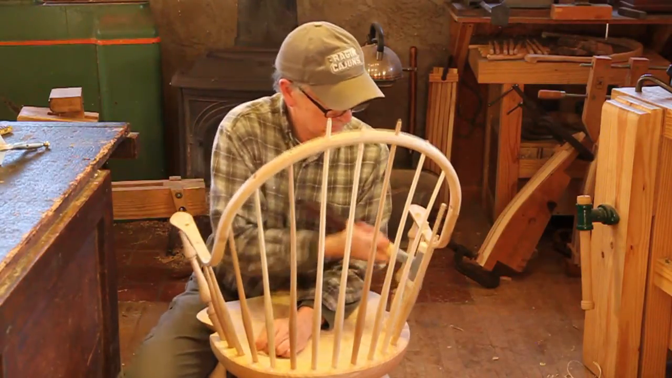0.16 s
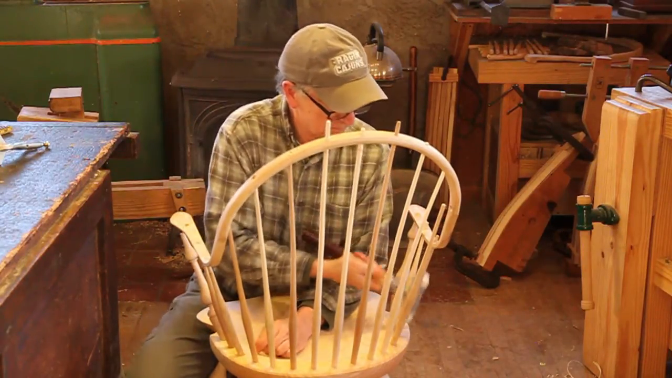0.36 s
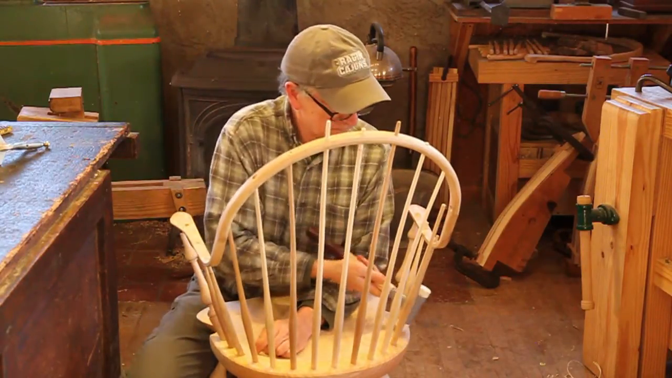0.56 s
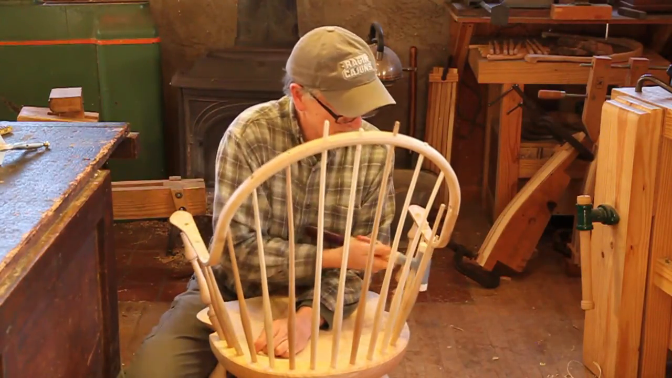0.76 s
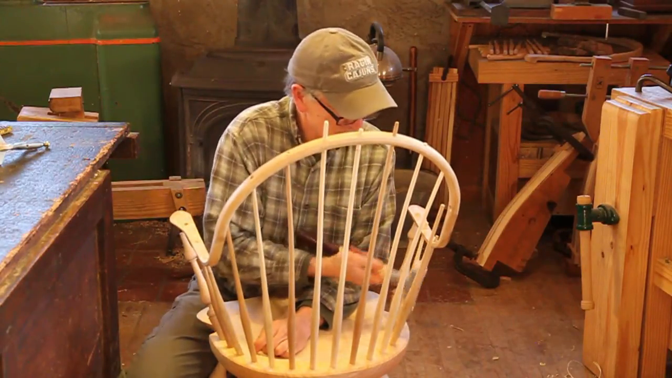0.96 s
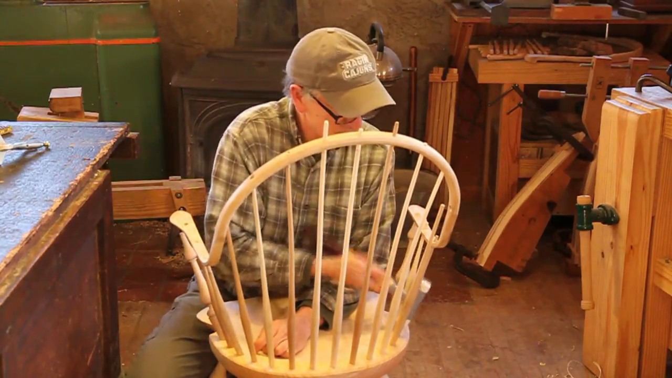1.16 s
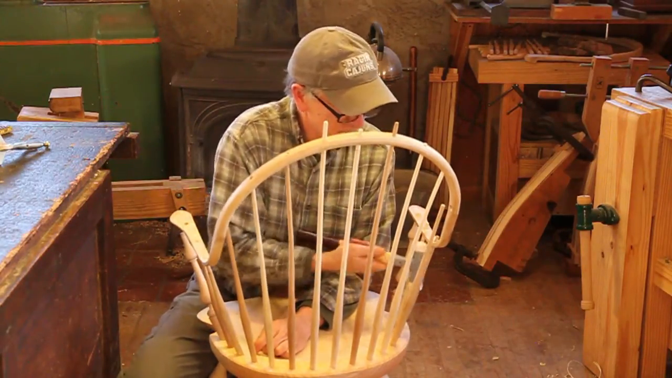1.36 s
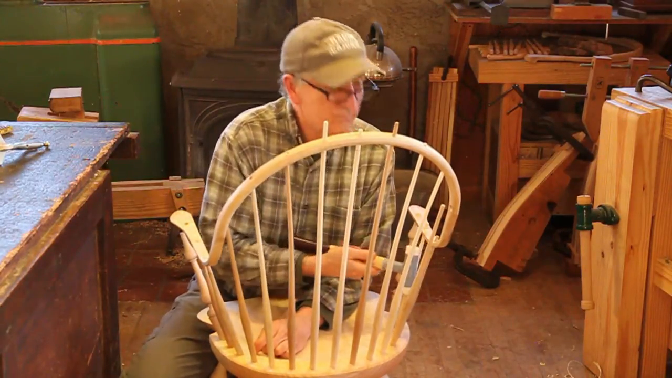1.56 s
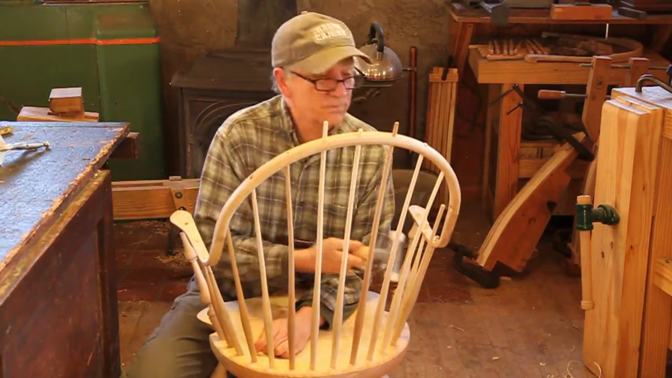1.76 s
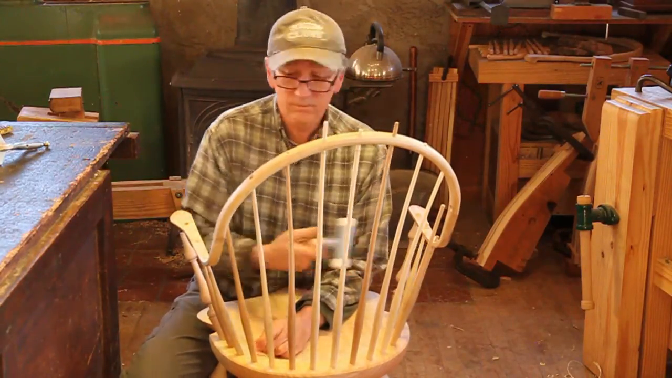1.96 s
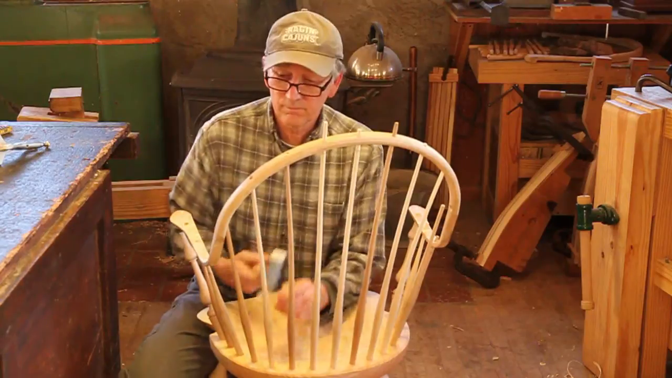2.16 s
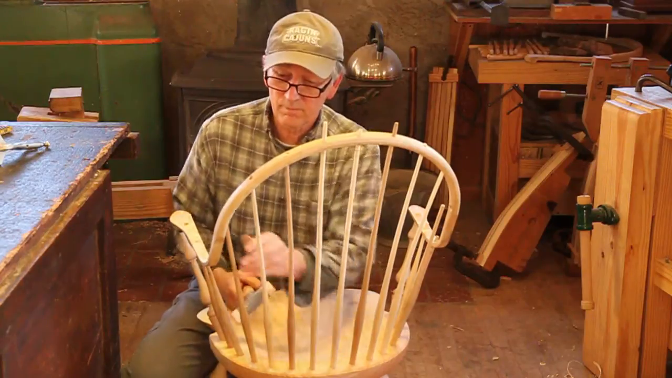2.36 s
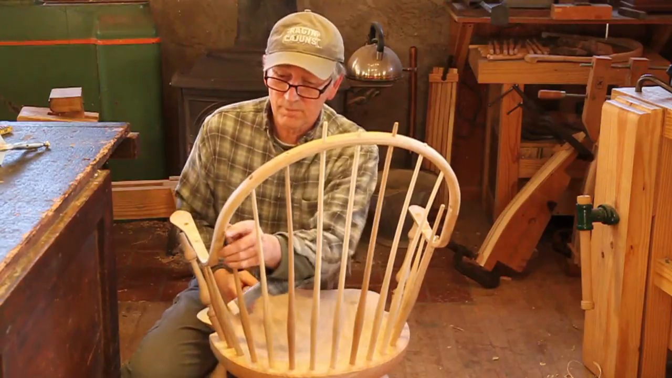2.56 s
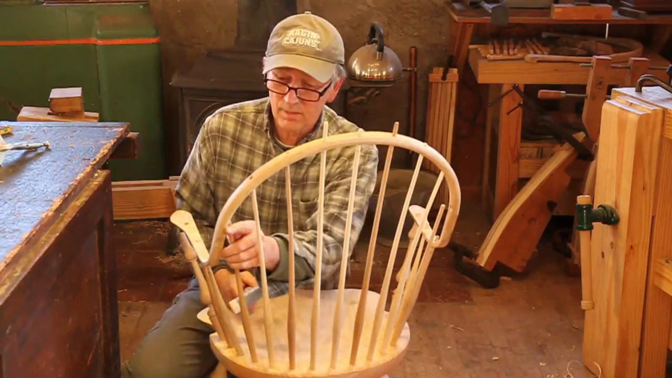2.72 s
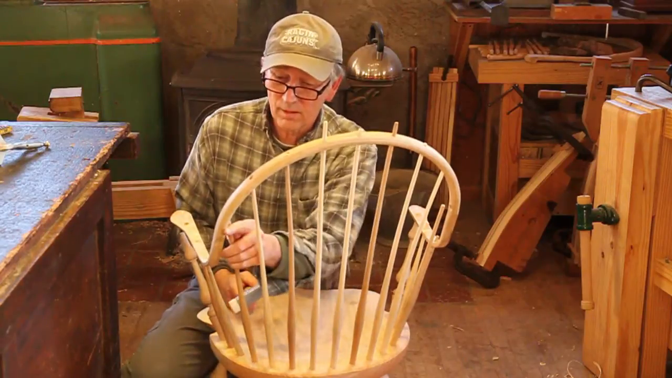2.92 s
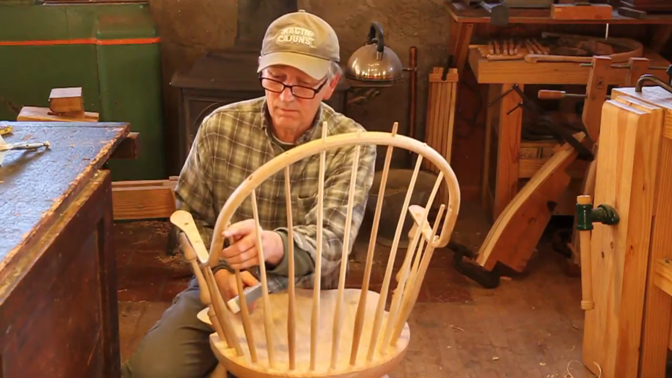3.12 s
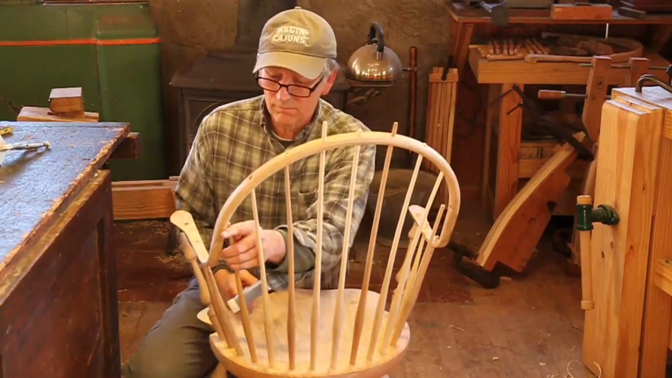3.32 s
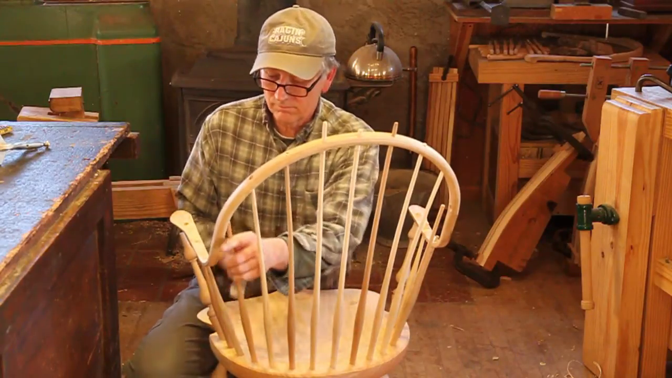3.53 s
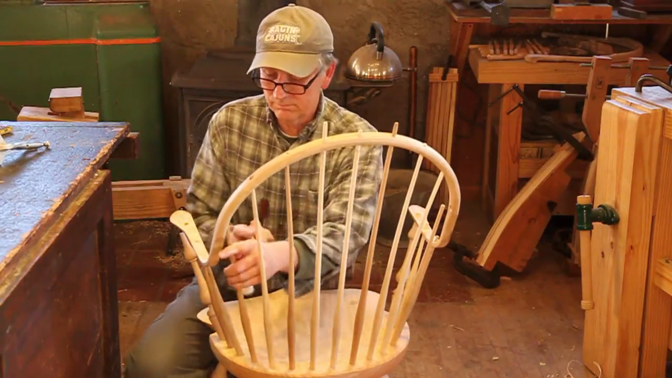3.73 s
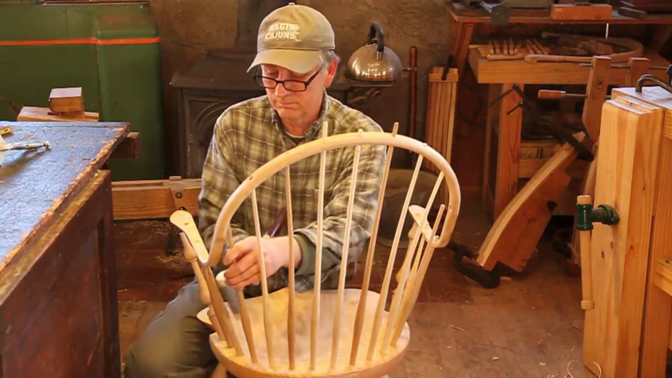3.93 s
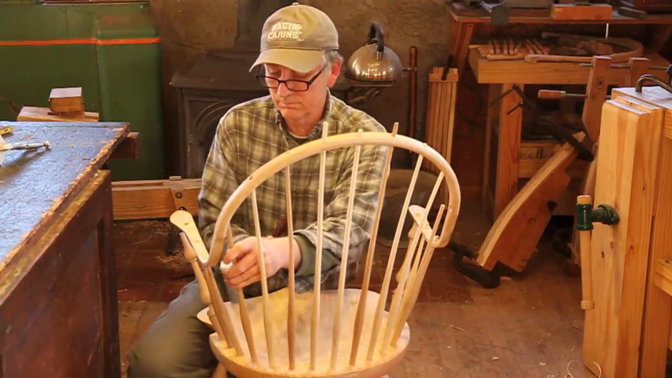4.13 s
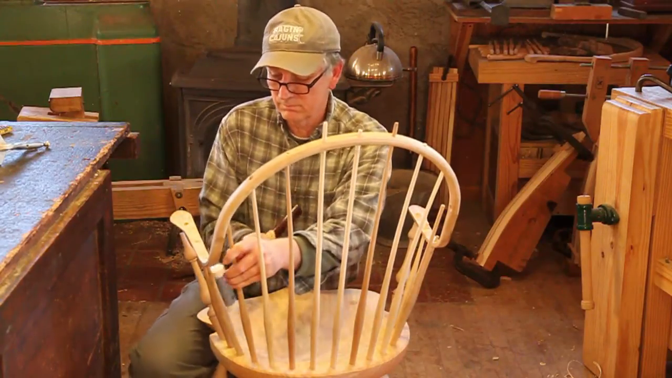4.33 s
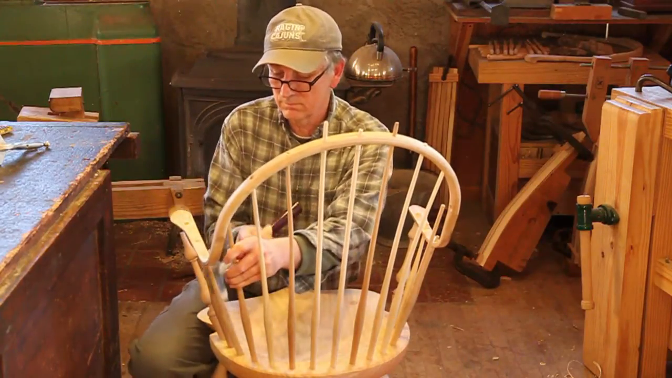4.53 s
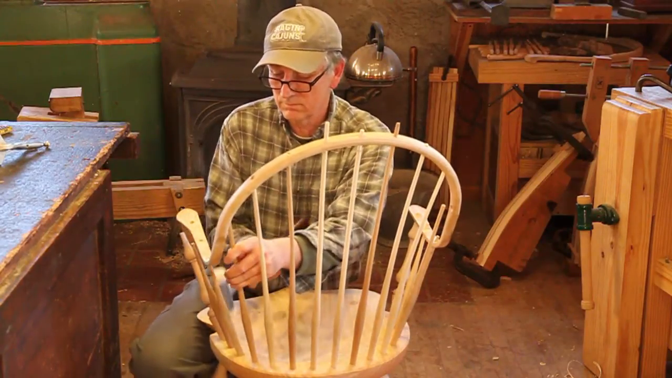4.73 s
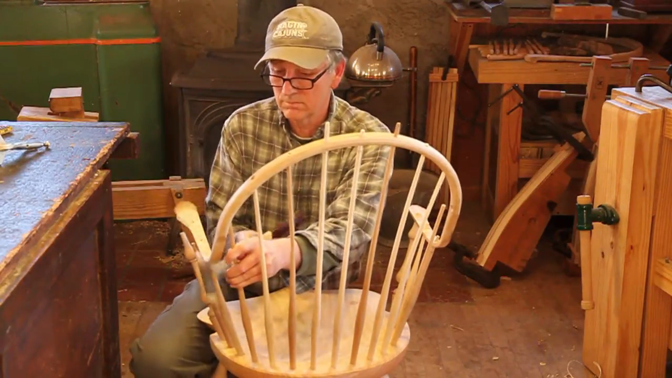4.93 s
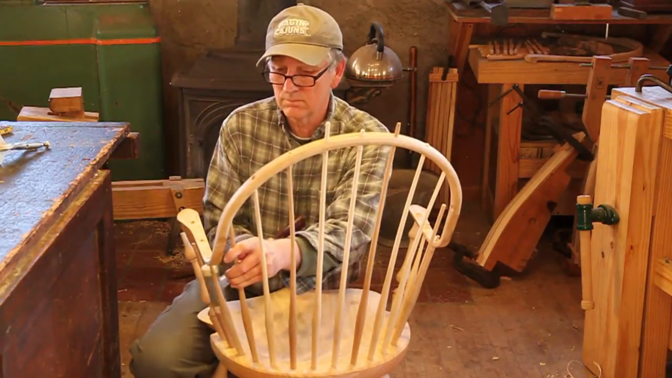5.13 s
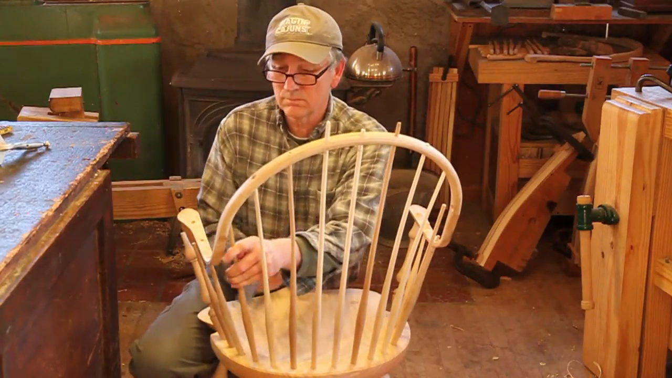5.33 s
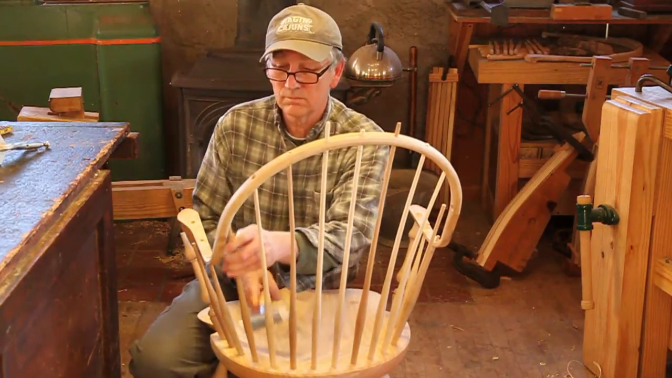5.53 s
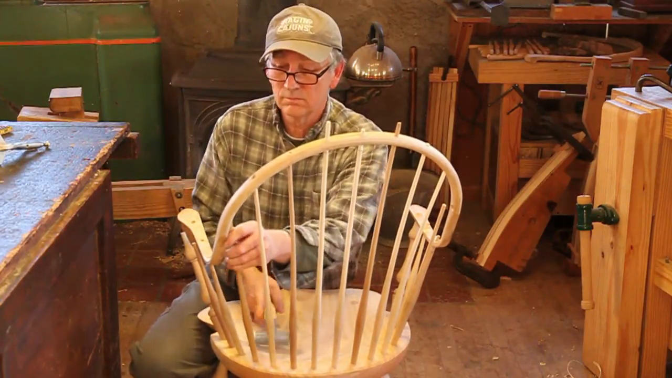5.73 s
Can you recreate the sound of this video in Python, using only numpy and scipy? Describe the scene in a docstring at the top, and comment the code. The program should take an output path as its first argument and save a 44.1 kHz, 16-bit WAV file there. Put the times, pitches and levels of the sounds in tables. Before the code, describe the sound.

Close mono pickup in a small reverberant workshop. Three loud, crisp hammer blows on a chair frame, with tiny taps and slides of the tool between them. About three seconds of light clunks, rubs and a soft skin-on-wood brush come next, then two woody knocks with more low body, and finally a heavy soft bump on the seat. The recording level dips at loud blows, and the faint room noise slowly rises again.

```python
"""Hammer blows knock a wooden chair together in a small, live workshop: three on the right joint, two on the left.
Each is a coloured contact pulse that rings the modes of the frame, plus a short ping of the hammer face.
Around them a tool touches and slides on the wood, the seat is bumped and a hand brushes a spindle.
Noise-like reflections make the early crack and the swell of the room; a steady rumble and hiss lie beneath.
One microphone channel: its gain drops when a knock is loud and slowly recovers."""
import sys
import numpy as np
from scipy import signal
from scipy.fft import rfft, irfft
from scipy.io import wavfile
from scipy.ndimage import uniform_filter1d

SR = 44100
rng = np.random.default_rng(int(sys.argv[2]) if len(sys.argv) > 2 else 0)


def to_wav(sig):
    """Store sig (one row per channel, or 1-D mono) as 16-bit WAV at the path in sys.argv[1].

    Samples outside -1..1 are clipped; the rate is SR.
    """
    pcm = np.clip(np.atleast_2d(sig), -1, 1) * 32767
    pcm = np.round(pcm).astype(np.int16)
    wavfile.write(sys.argv[1], SR, pcm.T)  # frames by channels


N = 254898

BASS_HZ, TREBLE_HZ = 400, 4430   # corners of the bass and treble tilts


def from_db(db):
    """Decibels to gain."""
    return 10 ** (np.asarray(db) / 20)


def at_hz(rows, hz):
    """Every column of a table, read on a log-frequency axis."""
    freqs, *columns = np.transpose(rows)
    log_hz = np.log(np.maximum(hz, 1))
    return [np.interp(log_hz, np.log(freqs), column) for column in columns]


def bass_tilt(hz):
    """Share of a bass boost that reaches each frequency: all of it far below the corner, none far above."""
    return 1 / (1 + (hz / BASS_HZ) ** 2)


def add(out, s, sound):
    """Mix a sound in at a time in seconds."""
    start = max(0, round(s * SR))
    out[start:start + len(sound)] += sound[:max(0, N - start)]


def noise(spectrum):
    """Steady noise of a given colour, rms 1."""
    gain = from_db(at_hz(spectrum, np.fft.rfftfreq(N, 1 / SR))[0])
    x = irfft(rfft(rng.standard_normal(N)) * gain, N)
    return x / np.std(x)


# colour of the low room rumble: (frequency [Hz], relative density [dB per Hz])
RUMBLE = [(15, -44.5), (25, -11), (49, -22), (81, -6.5), (102, -4.5), (162, -11.5), (390, -21),
          (441, -23.5), (507, -26.5), (1000, -32), (1300, -57.5), (2200, -120)]
# colour of the faint hiss, shared by the brushing hand: (frequency [Hz], relative density [dB per Hz])
HISS = [(240, -35.5), (400, -4), (734, -4.5), (964, -7), (1430, -7.5), (2060, -10), (12900, -18.5),
        (15000, -47.5)]
RUMBLE_DB, HISS_DB = -65, -68   # rms levels before the gain control


def background():
    """Low room rumble and a faint hiss, both steady filtered noise."""
    return from_db(RUMBLE_DB) * noise(RUMBLE) + from_db(HISS_DB) * noise(HISS)


# colour of a contact on each part of the chair, by part: (frequency [Hz], level [dB])
COLOUR = { "right joint": [(45, -31), (75, -6), (120, -7), (190, 1), (450, -0.5), (700, -4), (1400, -2.5),
          (2800, -1.5), (5300, -5.5), (7200, -9.5), (10000, -5), (12500, -13.5), (15500, -26.5)],
          "left joint": [(45, -25), (75, -7), (130, -0.5), (250, 4.5), (500, -2.5), (680, -4), (1000, -5),
          (1900, -2.5), (2300, -7), (4000, -5.5), (6500, -11), (10000, -20), (15000, -25)],
          "peg": [(50, -19), (200, 8.5), (600, 3), (1100, 5.5), (1600, 0), (3000, -0.5), (6000, -14.5),
          (11000, -23), (15000, -21.5)], "tool": [(50, -19), (200, 2.5), (670, -13), (1050, -10),
          (1250, -5.5), (2050, -3), (2220, -13), (2650, -1.5), (3350, -2.5), (3650, -19.5), (5250, -11),
          (5500, -23.5), (14000, -39.5)], "post": [(50, -9), (180, 2.5), (600, -6), (1450, -4),
          (2000, -1.5), (2450, -7.5), (3850, -10.5), (4100, -13), (6500, -15.5), (8500, -26.5),
          (10500, -22.5), (14000, -33)], "pin": [(50, -23), (200, -8.5), (700, -9.5), (1800, -2.5),
          (2600, -14), (3800, -18.5), (6000, -25), (14000, -36)], "seat": [(45, -21.5), (80, 5.5),
          (190, -1.5), (400, -5), (650, -17.5), (950, -19), (2200, -25.5), (5000, -43), (14000, -48.5)]}


def contact(part, bass_db=0, treble_db=0, size=4096):
    """The pulse of one contact: a heavier push adds bass, a harder face adds treble."""
    hz = np.fft.rfftfreq(size, 1 / SR)
    level_db = at_hz(COLOUR[part], hz)[0]
    level_db = level_db + bass_db * bass_tilt(hz)
    level_db = level_db + treble_db * hz ** 2 / (hz ** 2 + TREBLE_HZ ** 2)
    cepstrum = irfft(np.log(from_db(level_db)))[:size // 2]
    cepstrum[1:] *= 2   # minimum phase: nothing sounds before the touch
    return irfft(np.exp(rfft(cepstrum, size)))


# ringing modes of each part, by part: (frequency [Hz], height over the contact colour [dB], t60 [s])
MODES_OF = { "right joint": [(190, -6.5, .1), (272, 3, 0.097), (355, 3, 0.12), (461.4, 10.5, 0.23),
            (578, 5.5, 0.059), (818, 11.5, .15), (881.3, 12, 0.093), (966, 1, 0.072), (1170, -2, 0.046),
            (1347, 2.5, 0.048), (1535, 6, 0.067), (1673, 7.5, 0.18), (1800, 3.5, 0.28), (1980, -3.5, 0.056),
            (2470, 5.5, 0.22), (2580, -2.5, 0.0045), (2950, -3.5, 0.33), (3170, -2, .04), (3595, 4.5, .025),
            (3915, 5.5, 0.067), (4200, -3, 0.033), (4930, 3.5, 0.02), (5400, 4.5, 0.27), (5400, -2, 0.016),
            (6030, -0.5, .04), (9430, -1, 0.018), (10500, 0.5, 0.01)], "left joint": [(114, 10.5, 0.37),
            (146.8, 7.5, 0.28), (226, 4, 0.28), (287, 1, 0.57), (436.5, -1, 0.16), (517.4, 5.5, 0.27),
            (554.5, 10, 0.12), (820, 12, 0.045), (883, 11, 0.15), (886, 5.5, 0.066), (1089, 8.5, 0.13),
            (1229, 1.5, 0.041), (1470, 8, 0.1), (1683, 3, 0.12), (1880, -2.5, 0.18), (1947, 4, 0.017),
            (2340, 1.5, 0.052), (2575, 7.5, 0.075), (3130, -5.5, 0.15), (3480, 8.5, 0.058),
            (3820, 2.5, 0.017), (4180, 0, 0.024), (4670, 1.5, .05)], "peg": [(456, 2, .15),
            (1112, 11, .055), (2060, 3.5, .05), (3200, 5, .06)], "tool": [(224.3, 9.5, 0.26),
            (387, 14.5, 0.23), (857, 6.5, .1), (1230, 9.5, 0.03), (1500, -3, .04), (1821, 4, 0.04),
            (2040, 2, 0.072), (2770, 3.5, 0.12), (3160, 0, .2), (5040, 3, 0.015)],
            "post": [(187, -0.5, 0.17), (1214, 4, 0.019), (1660, -0.5, 0.059), (1890, 5.5, 0.047),
            (2040, 0.5, 0.056), (2920, 3.5, 0.032), (3880, -1.5, 0.013), (5160, 10.5, 0.025)],
            "pin": [(1740, 12, 0.09), (3750, 2, .04), (5640, 14, .04)], "seat": [(117, -0.5, 0.2),
            (173, 13, 0.27), (223, 8.5, 0.13), (256, 3.5, 0.75), (454.6, 9, 0.16), (873, 11.5, 0.13)]}


def ringing(part):
    """A part passes the pulse on and rings in its modes, each an exponentially decaying cosine."""
    t = np.arange(SR) / SR
    out = signal.unit_impulse(SR)
    for hz, height_db, t60 in MODES_OF[part]:
        decay = from_db(-60 * t / t60)
        weight = 2 * from_db(height_db) / decay.sum()   # long modes get no extra height
        out += weight * decay * np.cos(2 * np.pi * hz * t)
    return out


def jerks(share, length_s, above_hz=900, size=1024):
    """A contact is followed by brief chatter as the parts shift, new with every knock; energy about 1."""
    t = np.arange(size) / SR
    chatter = rng.standard_normal(size) * np.exp(-(t / length_s) ** 2)
    chatter = signal.sosfilt(signal.butter(2, above_hz, "high", fs=SR, output="sos"), chatter)
    chatter /= np.linalg.norm(chatter)
    share = np.clip(share, 0, 1)
    return np.sqrt(1 - share) * signal.unit_impulse(size) + np.sqrt(share) * chatter


def knocks(rows, rings, chatter_share, chatter_s):
    """Single contacts, each ringing the part that it lands on."""
    out = np.zeros(N)
    for s, level_db, bass_db, treble_db, part in rows:
        push = np.convolve(contact(part, bass_db, treble_db), jerks(chatter_share, chatter_s))
        add(out, s, from_db(level_db) * signal.fftconvolve(push, rings[part]))
    return out


# light touches, before the room is added; the first is already sounding as the scene begins: (time [s], level
# [dB], treble boost [dB], part touched)
TAPS = [(.002, -27.5, 5, "seat"), (0.492, -42.5, -4, "tool"), (.612, -37.5, -16, "peg"),
        (1.134, -37.5, -16, "peg"), (1.1792, -26.5, 12.5, "peg"), (2.44, -42.5, -13, "seat"),
        (2.518, -41.5, -14.5, "seat"), (2.565, -41.5, -11.5, "post"), (2.695, -27.5, 8.5, "seat"),
        (3.005, -34, -8.5, "seat"), (3.074, -35.5, -19, "seat"), (3.455, -43.5, -4.5, "peg"),
        (3.640, -30.5, 0, "post"), (3.641, -34.5, -11, "pin"), (4.3817, -24, -4, "tool"),
        (4.921, -46.5, 7.5, "pin"), (5.623, -38, 0.5, "seat"), (5.673, -20.5, -10, "seat"),
        (5.724, -7.5, -39.5, "seat")]
THUD_EVEN_DB, THUD_PER_DB = -35, 0.65   # a touch below this level has more bass, a firmer one less


def taps(rings):
    """A soft touch is mostly thud; the firmer it is, the more the wood itself speaks."""
    rows = []
    for s, level_db, treble_db, part in TAPS:
        bass_db = THUD_PER_DB * (THUD_EVEN_DB - level_db)
        rows.append((s, level_db, bass_db, treble_db, part))
    return knocks(rows, rings, chatter_share=0.41, chatter_s=0.013)


def scatter(lumpy_db=2.5, size=2048, count=300):
    """One second of dense reflections with random phases, arriving in clumps, with an even spectrum."""
    clumps = np.interp(np.linspace(0, count, SR), np.arange(count), rng.standard_normal(count))
    x = rng.standard_normal(SR) * from_db(lumpy_db * clumps)
    for window in (size // 16, size):   # level out the spectrum, keeping only the phases
        cells = signal.stft(x, nperseg=window)[2]
        x = signal.istft(cells / (np.abs(cells) + 1e-12), nperseg=window)[1][:SR]
    grown = np.minimum(np.arange(SR) / SR / 0.01, 1)   # the nearest paths are steady
    x = x * from_db(lumpy_db * clumps * grown)
    return x / np.std(x)


# the workshop by band; near_db and bass_near_db are added to the crack level:
# (frequency [Hz], near crack level [dB], crack length to 1/e [s], time until the room is full [s],
#  swell up to then [dB], t60 after it [s])
ROOM = [(71.1, -8, .016, 0.051, 16.5, 1.0), (127, -7, 0.036, 0.057, 14.5, 0.79),
        (260, 3, .008, 0.056, 5.5, 0.63), (549, -4, .007, 0.075, 2, 0.47),
        (1370, -3, 0.0034, 0.033, -2, 0.46), (3300, 12, 0.0014, 0.019, 0, 0.41),
        (6100, 12.5, 0.0026, 0.0026, -1, .34), (10100, 9, 0.0069, 0.0014, 3, 0.22),
        (15000, 9, 0.0049, .003, -1, 0.22)]


def workshop(x, near_db, bass_near_db, count=20):
    """Seat and spindles scatter a short near crack; then the room fills and decays, longest in the bass."""
    t, hz = np.arange(SR) / SR, np.fft.rfftfreq(SR, 1 / SR)
    centres = np.geomspace(50, 16000, count)
    reflections, response = rfft(scatter()), np.zeros(SR)
    for centre, share in zip(centres, np.eye(count)):
        crack_db, crack_s, full_s, swell_db, t60 = at_hz(ROOM, centre)
        band_gain = at_hz(np.c_[centres, share], hz)[0]   # overlapping triangles on the log axis
        band = irfft(reflections * band_gain, SR)
        crack_db += near_db + bass_near_db * bass_tilt(centre)
        crack = from_db(crack_db) * np.exp(-(t / crack_s) ** 2)
        filling_db = -swell_db * np.maximum(1 - t / full_s, 0)
        decay_db = -60 * np.maximum(t - full_s, 0) / t60
        response += band * np.hypot(crack, from_db(filling_db + decay_db))
    return signal.fftconvolve(x, response)[:N]


# the tool slides over the wood, before the room is added: (start [s], end [s], level [dB], part rubbed)
SLIDES = [(0.079, 0.147, -34.5, "post"), (0.629, 0.658, -30.5, "post"), (2.576, 2.643, -52.5, "post"),
          (2.694, 2.7, -45, "pin"), (3.014, 3.037, -55, "post"), (3.449, 3.503, -35, "post"),
          (4.826, 4.867, -39, "pin"), (5.624, 5.64, -45, "post")]


def slides(rings, slips_per_s=500):
    """Sliding is a dense run of tiny uneven slips."""
    out = np.zeros(N)
    for start, end, level_db, part in SLIDES:
        n = max(round((end - start) * SR), SR // 200)   # at least 5 ms
        chance, force = rng.random(SR)[:n], rng.standard_normal(SR)[:n]
        slips = (chance < slips_per_s / SR) * force * np.sqrt(np.hanning(n))
        slips *= from_db(level_db) / (np.linalg.norm(slips) + 1e-9)   # level of the whole slide
        wood = signal.fftconvolve(contact(part), rings[part])
        add(out, start, signal.fftconvolve(slips, wood))
    return out


# hammer blows, before the room is added: (time [s], level [dB], bass boost [dB], treble boost [dB],
#  part struck, ping of the hammer face [Hz], ping level [dB])
BLOWS = [(0.1273, -4, 1, 1, "right joint", 2820, -2), (0.6647, -1, -2, 0.5, "right joint", 5300, 0.5),
         (1.2260, -6, 2, 1.5, "right joint", 3690, 0), (4.5425, -7, -1.5, -0.5, "left joint", 3800, -18.5),
         (4.9363, -12.5, 1.5, -1, "left joint", 3990, -4)]


def hammering(rings):
    """Firm blows ring the joints, each with its own reflections as the chair shifts."""
    blows = [knocks([row[:5]], rings, chatter_share=0.13, chatter_s=0.0012) for row in BLOWS]
    return sum(workshop(blow, near_db=-5.0, bass_near_db=-11.0) for blow in blows)


def pings(length_s=.0014, count=100):
    """While in contact the hammer face gives a few cycles of a hard ping, straight to the microphone."""
    out, t = np.zeros(N), np.arange(count) / SR
    swell = np.sin(np.pi * np.minimum(t / length_s, 1)) ** 2
    for s, *_, ping_hz, ping_db in BLOWS:
        add(out, s, from_db(ping_db) * swell * np.sin(2 * np.pi * ping_hz * t))
    return out


# a hand brushes along a spindle: (time [s], level [dB])
BRUSHES = [(3.385, -57.5), (5.44, -64)]
BRUSH_RISE_S, BRUSH_FALL_S = 0.055, 0.3


def brushes():
    """Skin on bare wood: a soft hiss that swells quickly and fades as the hand slows."""
    t, speed = np.arange(N) / SR, np.zeros(N)
    for s, level_db in BRUSHES:
        stroke = np.interp(t - s, [0, BRUSH_RISE_S, BRUSH_RISE_S + BRUSH_FALL_S], [0, 1, 0])
        speed += from_db(level_db) * stroke
    return speed * noise(HISS)


# the recorder's gain control: threshold, share of the excess taken away, release
LIMIT_DB, LIMIT_SHARE, RECOVERY_DB_PER_S = -17, 0.91, 4.5
DETECTOR_S, LOOK_AHEAD_S = 0.011, 0.0032


def gain_control(x):
    """Loud knocks push the gain down at once; it creeps back steadily, and the background rises with it."""
    t = np.arange(N) / SR
    power = uniform_filter1d(x[0] ** 2, max(1, round(DETECTOR_S * SR)))
    power_db = 10 * np.log10(np.maximum(power, 1e-12))
    excess_db = np.clip(LIMIT_SHARE, 0, 1) * np.maximum(power_db - LIMIT_DB, 0)
    recovered_db = RECOVERY_DB_PER_S * t
    duck_db = np.maximum.accumulate(excess_db + recovered_db) - recovered_db
    return x * from_db(-np.interp(t + LOOK_AHEAD_S, t, duck_db))


def scene():
    """Firm blows and looser handling in the same room, with pings, brushes and background added direct."""
    rings = {part: ringing(part) for part in MODES_OF}
    blows = hammering(rings)
    handling = workshop(taps(rings) + slides(rings), near_db=-3.5, bass_near_db=13)
    return (pings() + blows + handling + brushes() + background())[None]


CUTOFF_HZ = 15800


def record(dry):
    """The gain control holds loud knocks down, the highest peaks are rounded and the top is cut."""
    rounded = 1.3 * np.tanh(gain_control(dry) / 1.3)
    low_pass = signal.ellip(10, .2, 70, CUTOFF_HZ, fs=SR, output="sos")   # .2 dB ripple, 70 dB stop
    return signal.sosfilt(low_pass, rounded)


dry = scene()
out = record(dry)
to_wav(out)
```